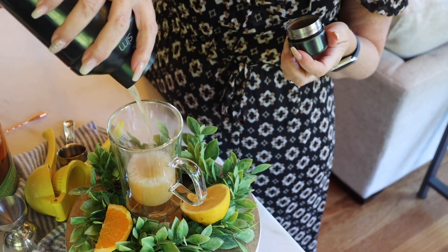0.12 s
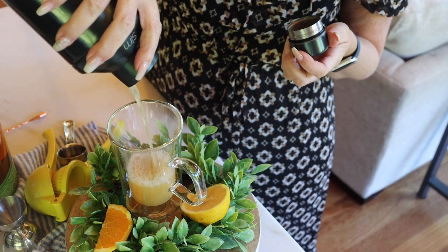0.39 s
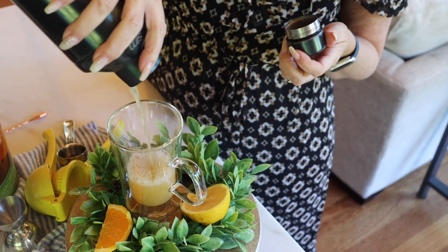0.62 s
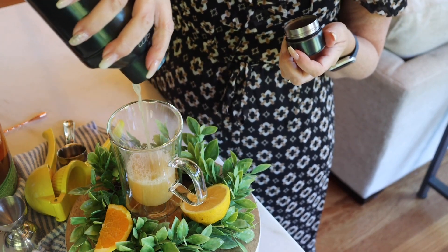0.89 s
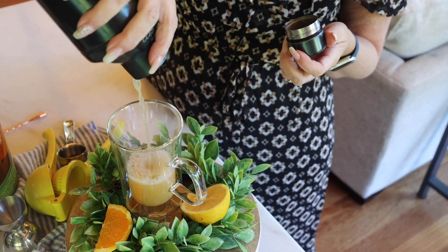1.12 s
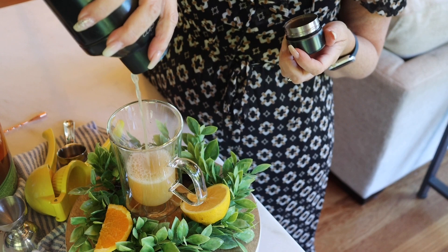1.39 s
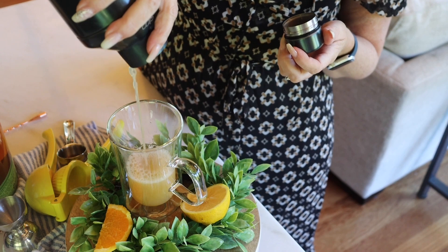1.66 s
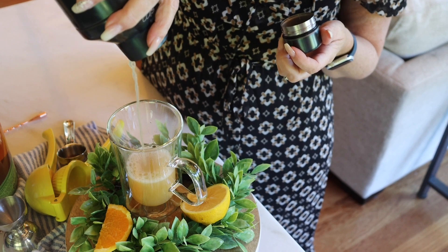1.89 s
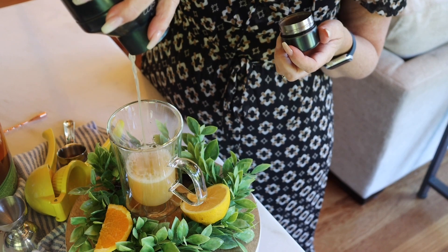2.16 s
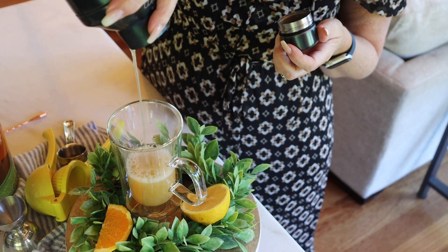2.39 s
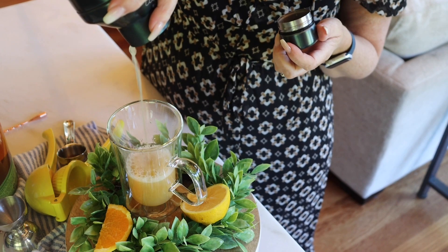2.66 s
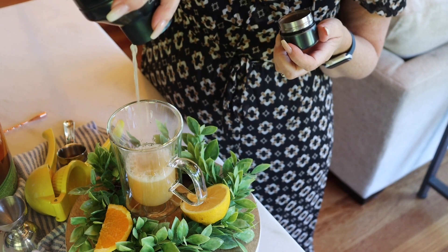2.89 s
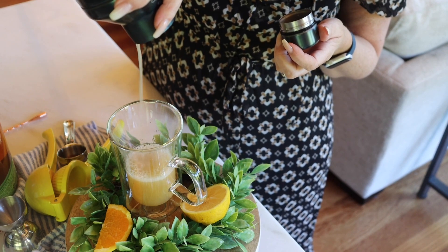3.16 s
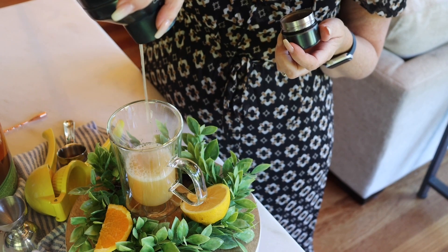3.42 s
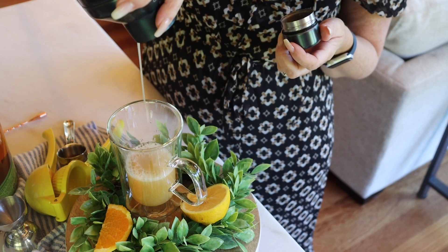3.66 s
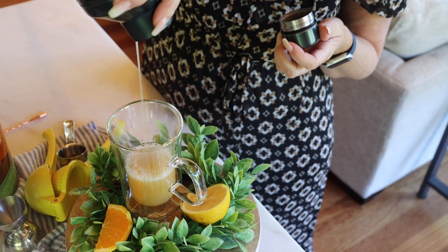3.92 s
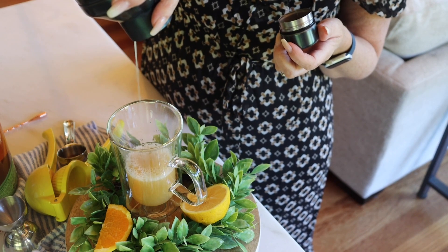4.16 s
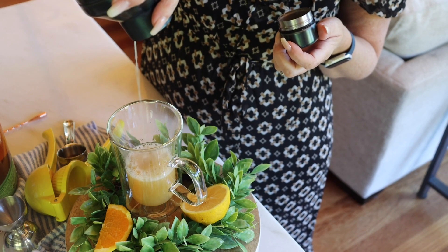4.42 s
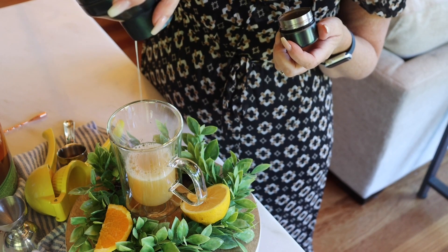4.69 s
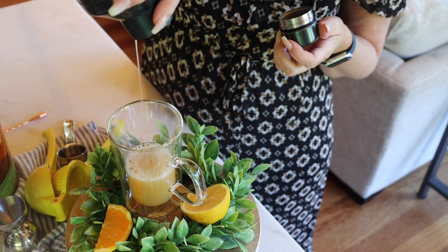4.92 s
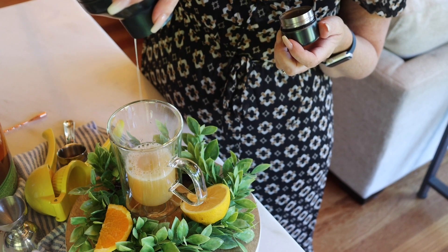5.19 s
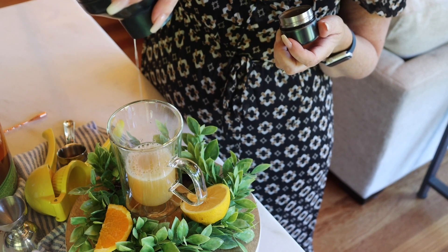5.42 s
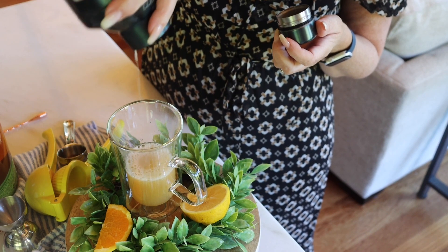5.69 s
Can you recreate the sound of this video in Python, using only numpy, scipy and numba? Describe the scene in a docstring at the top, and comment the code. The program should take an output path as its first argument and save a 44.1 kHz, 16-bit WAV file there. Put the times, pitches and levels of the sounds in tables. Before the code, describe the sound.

Close, wet pour into glass with hollow plops and crisp bubble ticks, crowding mid-way then dwindling to drips over faint room hum.

```python
"""A drink is poured from a shaker into a glass mug in a quiet kitchen, over steady room noise and a wavering hum.
An opening gurgle of clumped clicks through ringing bubbles breaks up into sparse plops: rising sines that drive
the air column. From about 1.7 s the stream returns and plops crowd, with ticking bubbles and fizz of short rings
and noise; after about 4 s it thins to a trickle. The column pitch climbs throughout as the glass fills."""
import sys
import numpy as np
from scipy import signal
from scipy.fft import rfft, irfft, next_fast_len
from scipy.io import wavfile
from numba import njit

SR = 44100
rng = np.random.default_rng(int(sys.argv[2]) if len(sys.argv) > 2 else 0)


def volts_from_db(level):
    """Convert decibel levels to linear amplitude ratios."""
    exponent = np.asarray(level, float) / 20
    return 10 ** exponent


def output_pcm(signal):
    """Save a mono or channel-first signal as 16-bit PCM at the path in sys.argv[1].

    Samples are clipped to [-1, 1] before scaling.
    """
    pcm = np.clip(np.atleast_2d(signal).T, -1, 1) * 32767
    wavfile.write(sys.argv[1], SR, np.round(pcm).astype(np.int16))


N = 256309


def rms_one(x):
    """Scale to unit rms."""
    return x / np.sqrt(np.mean(x ** 2) + 1e-20)


def in_time(rows):
    """Columns of a time curve, interpolated at every sample."""
    s, *columns = np.transpose(rows)
    return [np.interp(np.arange(N) / SR, s, c) for c in columns]


def at_hz(points):
    """A spectrum table on the FFT grid, interpolated over log frequency."""
    hz = np.arange(N // 2 + 1) * SR / N + 1
    table_hz, values = np.array(points).T
    return np.interp(np.log(hz), np.log(table_hz + 1), values)


def filtered(x, order, hz, kind):
    """Butterworth filter."""
    return signal.sosfilt(signal.butter(order, hz, kind, fs=SR, output="sos"), x)


def drift(corner_hz):
    """Slow random curve of unit rms: noise through two equal poles."""
    r = np.exp(-2 * np.pi * corner_hz / SR)
    return rms_one(signal.lfilter([1], [1, -2 * r, r * r], rng.standard_normal(N + SR))[SR:])


def grains(per_s, spread_db, most=3.34):
    """Random clicks of either sign, a few much larger than the rest."""
    sizes = volts_from_db(spread_db * np.minimum(rng.exponential(1, N), most)) * rng.choice([-1, 1], N)
    return sizes * (rng.random(N) < per_s / SR)


def ring(clicks, hz, t60_s):
    """Damped mode: a unit click starts a sine of height 1."""
    r, w = volts_from_db(-60 / (t60_s * SR)), 2 * np.pi * hz / SR
    return signal.lfilter([0, np.sin(w)], [1, -2 * r * np.cos(w), r * r], clicks + 1e-18)


def dealt_rings(clicks, low_hz, high_hz, cycles, count):
    """Each click rings at one of several pitches, dealt at random, down 60 dB after some cycles."""
    dealt = rng.integers(0, count, N)
    pitches_hz = np.geomspace(low_hz, high_hz, count)
    return sum(ring(clicks * (dealt == k), hz, cycles / hz) for k, hz in enumerate(pitches_hz))


@njit
def sliding_ring(x, w, r):
    """Damped mode whose pitch follows w, in radians a sample."""
    y = np.zeros(len(x))
    for i in range(2, len(x)):
        y[i] = np.sin(w[i]) * x[i - 1] + 2 * r * np.cos(w[i]) * y[i - 1] - r * r * y[i - 2]
    return y


def aftermath(x, t60_s):
    """The dying stir that each event leaves behind: a smoothed envelope."""
    fade = volts_from_db(-60 / (t60_s * SR))
    return signal.lfilter([1 - fade], [1, -fade], np.abs(x))


# room noise spectrum, relative (f/Hz, level per Hz/dB)
HUSH_SPECTRUM = [(25, -6), (40, -2.5), (125, 5), (250, -0.5), (450, 4.5), (800, -2.5), (1600, -9.5),
                 (2600, -11.5), (5000, -12.5), (9000, -14.5), (12300, -16), (15500, -26)]
# left-right correlation of the room noise (f/Hz, correlation/1)
HUSH_LIKENESS = [(60, 0.93), (300, 0.8), (1000, 0.2), (4000, 0.067), (15000, 0.15)]
HUSH_RMS_DB = -54
HUM_HZ, HUM_WAVER_RMS_HZ, HUM_PEAK_DB, HUM_DRIFT_RMS_DB = 218, 3.76, -63, 3.2


def hush():
    """Steady room noise, more alike left and right in the bass, with an appliance hum wavering in pitch and level."""
    mid, side = rfft(rng.standard_normal((2, N))) * volts_from_db(at_hz(HUSH_SPECTRUM))
    alike = np.clip(at_hz(HUSH_LIKENESS), 0, 1)
    noise = rms_one(irfft(np.sqrt(1 + alike) * mid + np.sqrt(1 - alike) * side * [[1], [-1]], N))
    hum = np.sin(2 * np.pi * np.cumsum(HUM_HZ + HUM_WAVER_RMS_HZ * drift(7.2)) / SR)
    return volts_from_db(HUSH_RMS_DB) * noise + volts_from_db(HUM_PEAK_DB + HUM_DRIFT_RMS_DB * drift(1.0)) * hum


KITCHEN_T60_S, WALL_CUT_HZ, KITCHEN_DB = 0.55, 5700, -23.5


def kitchen(x):
    """Room reverberation: eight feedback delays a side, duller on every round."""
    size = next_fast_len(N + SR)
    turn = np.exp(-2j * np.pi * np.arange(size // 2 + 1) / size)  # delay of one sample
    dull = np.exp(-2 * np.pi * WALL_CUT_HZ / SR)
    wall = (1 - dull) / (1 - dull * turn)
    out = np.zeros((2, size // 2 + 1), complex)
    for k, lag in enumerate((np.geomspace(.007, .033, 16) * SR).astype(int)):
        loop = volts_from_db(-60 * lag / SR / KITCHEN_T60_S) * wall * turn ** lag
        out[k % 2] += loop / (1 - loop) * (-1) ** (k // 2)
    return volts_from_db(KITCHEN_DB) * irfft(out * rfft(x, size), size)[:, :N]


TABLE_T60_S, TABLE_DB = 0.035, -6


def table_top(x):
    """Leaves, fruit and glassware close by scatter the treble into a short dense tail, another one to each side."""
    t = np.arange(round(TABLE_T60_S * SR)) / SR
    tails = rng.standard_normal((2, len(t))) * volts_from_db(-60 * t / TABLE_T60_S)
    tails = volts_from_db(TABLE_DB) * tails / np.linalg.norm(tails, axis=1, keepdims=True)
    return filtered(signal.fftconvolve(x[None], tails, axes=1)[:, :N], 1, 2000, "high")


# level of left over right (f/Hz, level/dB)
LEFT_LOUDER = [(300, 2), (2400, -2.5), (5000, -0.5), (13000, 4.5)]
# phase lead of left over right (f/Hz, phase/rad)
LEFT_LEADS = [(1500, 0.026), (3000, 0.83), (4500, 0.06), (8000, 0.97), (10500, 1.64), (14000, 0.6)]
SPOT_SCATTER_RAD = 0.28  # rms, each side, before the treble weighting


def two_ports(x):
    """Two microphone openings differ in level and phase by pitch; scattered droplets make treble phase wander."""
    half = volts_from_db(at_hz(LEFT_LOUDER) / 2) * np.exp(.5j * at_hz(LEFT_LEADS))
    both = rfft(x) * np.array([half, 1 / half])
    turn = SPOT_SCATTER_RAD * drift(34.0) * [[1], [-1]]
    treble = both * np.clip(at_hz([(1300, 0.), (2200, 1.0), (15000, 0.44)]), 0, 1)
    return irfft(both, N) + irfft(treble, N) * (np.cos(turn) - 1) + irfft(1j * treble, N) * np.sin(turn)


# level of the low wash, relative to the churn (t/s, level/dB)
WASH_LEVEL = [(0, -16), (1.7, -17), (2.9, -20), (3.2, -12.5), (3.6, -16.5), (4, -29), (5.81, -12.5)]


def slosh(churn):
    """The churned drink heaves against the walls: a low, dull band of noise."""
    wash = filtered(rng.standard_normal(N), 2, [320., 760.], "band")
    return volts_from_db(in_time(WASH_LEVEL)[0]) * churn * rms_one(wash)


# drive of a hollow ring, swelling then fading as the shaker is lifted away (t/s, level/dB)
HOLLOW_LEVEL = [(0, -28.5), (1.2, -21), (2.3, -28), (3.2, -36), (5.81, -65)]


def hollow(push):
    """A low damped mode, probably the air in the shaker."""
    return volts_from_db(in_time(HOLLOW_LEVEL)[0]) * ring(push, hz=393.7, t60_s=0.12)


# modes of the glass wall (f/Hz, level/dB, t60/s)
GLASS_MODES = [(1761, -21, 0.078), (1890, -18, 0.046), (2645, -29, 0.058)]


def glass(push):
    """Walls and stand answer the liquid with their own damped modes."""
    return sum(volts_from_db(level_db) * ring(push, hz, t60_s) for hz, level_db, t60_s in GLASS_MODES)


# air column above the drink; a rough surface spreads its modes (t/s, f/Hz, spread/share of f)
AIR_COLUMN = [(0, 966, 0.11), (1.5, 998, 0.17), (2.3, 1027, 0.17), (3.2, 1036, 0.097), (4, 1132, 0.042),
              (5.81, 1165, 0.041)]


def column_pitch():
    """Column pitch in radians a sample, rising as the glass fills, and the spread of its modes."""
    hz, spread = in_time(AIR_COLUMN)
    return 2 * np.pi * hz / SR, spread


def rim(x):
    """The mouth passes a band round the column pitch: two broad resonances of opposite sign, steep outside."""
    w, spread = column_pitch()
    r = np.exp(-np.pi * 260. / SR)  # bandwidth 260 Hz
    lower = sliding_ring(x, w * (1 - 0.52 * spread), r)
    upper = sliding_ring(x, w * (1 + 1.95 * spread), r)
    return 2 * (1 - r) * (lower - upper)


def air_column(push, t60_s):
    """The air above the drink rings as a main mode with two neighbours."""
    w, spread = column_pitch()
    r = volts_from_db(-60 / (t60_s * SR))
    main = sliding_ring(push, w, r)
    below = sliding_ring(push, w * (1 - spread), r)
    above = sliding_ring(push, w * (1 + spread), r)
    return rim(main + 0.19 * below + 0.37 * above)


# colour of sharp sounds (f/Hz, level/dB)
SNAP_SPECTRUM = [(600, -79), (1500, 1.5), (2500, 2), (3600, 0), (6000, -1), (8000, 1), (9700, -5.5),
                 (11300, 1.5), (12500, 4.5), (13800, -4.5), (15500, 7)]


def snap_colour(x):
    """Colour that glass and microphone give to anything sharp; minimum phase, so nothing sounds early."""
    cepstrum = irfft(np.log(volts_from_db(at_hz(SNAP_SPECTRUM))), N)
    cepstrum[1:N // 2] *= 2
    cepstrum[N // 2 + 1:] = 0
    return irfft(rfft(x) * np.exp(rfft(cepstrum)), N)


def fizz(stir, clumps):
    """Tiny bubbles ring a few cycles, film snaps tick at pitches of their own, finer droplets blend into a rush."""
    busy = volts_from_db(5.0 * clumps + 5.0 * drift(40.))
    bubble_clicks = grains(500.0 * busy, spread_db=4.5, most=2.5)
    rings = rms_one(dealt_rings(bubble_clicks, 1900.0, 14000.0, cycles=25.0, count=18))
    film_clicks = grains(35. * busy, spread_db=5.5, most=2.5)
    ticks = rms_one(dealt_rings(film_clicks, 2500.0, 15400.0, cycles=5.0, count=12))
    rush = volts_from_db(0.65 * clumps) * rng.standard_normal(N)
    return stir * snap_colour(rings + 0.49 * ticks + 0.19 * rush)


def gurgle(stir, clumps):
    """The stream beats on the surface in clumps and drags bubbles of many sizes under; each beat ticks."""
    beats = grains(320. * volts_from_db(6. * clumps), spread_db=3.5, most=3.)
    bubbles = rms_one(rim(dealt_rings(beats, 681.0, 1470.0, cycles=46.0, count=10)))
    ticks = rms_one(snap_colour(beats))
    return stir * (rms_one(air_column(beats, t60_s=0.028)) + 0.5 * bubbles + 0.27 * ticks)


def blips(events, cycles, rise, swell_cycles, gain_db):
    """Each bubble swells, rings some cycles and rises in pitch, nearing the surface, then holds it."""
    out, chance = np.zeros(N + SR), rng.standard_normal(len(events))
    for (s, peak_db, hz), rings, steeper in zip(events, np.broadcast_to(cycles, len(events)), chance):
        turns = np.arange(SR // 10) * hz / SR
        shape = (1 - np.exp(-turns / swell_cycles)) * volts_from_db(-60 * turns / rings)
        climb = np.minimum(turns, rings / 2)
        bend = rise * np.exp(0.404 * steeper) * climb * (2 * turns - climb)
        at = round(s * SR)
        out[at:at + len(turns)] += volts_from_db(peak_db + gain_db) * shape / shape.max() * np.sin(2 * np.pi * (turns + bend))
    return out[:N]


def impacts(events, gain_db):
    """The bare click with which an event begins, its level scattered by 3 dB rms."""
    out = np.zeros(N)
    for (s, peak_db, hz), chance in zip(events, rng.standard_normal(len(events))):
        out[round(s * SR)] += volts_from_db(peak_db + gain_db + 3. * chance)
    return out


# levels in these three are before gain_db; f is the starting pitch
# lumps plunging in, each trapping air of its own pitch (t/s, level/dB, f/Hz)
PLOPS = [(0.014, -36, 950), (0.039, -30.5, 940), (0.108, -25, 980), (0.132, -27, 990), (0.162, -23.5, 990),
         (0.2, -32, 1000), (0.251, -18, 975), (0.566, -18.5, 1010), (0.787, -33.5, 1090),
         (0.971, -31, 1020), (1.113, -12.5, 1014), (1.213, -31, 984), (1.347, -26.5, 993),
         (1.476, -36, 1210), (1.518, -27, 930), (1.55, -33.5, 1030), (1.6, -33.5, 1120), (1.635, -33, 1240),
         (1.674, -25, 1240), (1.842, -28.5, 1310), (1.862, -22.5, 1230), (1.884, -24.5, 994),
         (1.925, -20, 1170), (1.946, -23.5, 1190), (2.029, -19.5, 926), (2.091, -19, 1020),
         (2.097, -19, 856), (2.214, -22, 1055), (2.251, -10.5, 1060), (2.284, -21.5, 1020),
         (2.312, -17, 1070), (2.337, -18, 1090), (2.488, -22, 1110), (2.596, -13, 1034), (2.638, -17, 1060),
         (2.704, -17.5, 1060), (2.725, -10.5, 1063), (2.773, -21, 1130), (2.784, -15.5, 1025),
         (2.889, -24.5, 1100), (2.912, -14.5, 1070), (2.954, -17, 990), (2.967, -19, 1085),
         (3.007, -23, 1110), (3.078, -4.5, 1030), (3.147, -12, 1040), (3.155, -8.5, 1000),
         (3.226, -20, 1000), (3.255, -24, 1050), (3.279, -27, 1190), (3.386, -22.5, 1060),
         (3.446, -20, 1096), (3.565, -17.5, 954), (3.589, -19, 1210), (3.7362, -6, 1074),
         (3.791, -13.5, 1176), (3.804, -18, 1060), (3.8352, -13.5, 1120), (3.984, -15, 1110),
         (4, -25, 1150), (4.034, -17.5, 1130), (4.095, -11, 1113), (4.245, -12, 1130), (4.317, -28, 1210),
         (4.5225, -18.5, 1176), (4.534, -24, 1190), (4.577, -26, 1150), (4.68, -31.5, 1200),
         (4.767, -21.5, 1200), (4.848, -18.5, 1170), (4.867, -26, 1220), (4.991, -26.5, 1225),
         (5.045, -29.5, 1226), (5.1, -31.5, 1230), (5.2025, -19, 1220), (5.302, -23.5, 1166),
         (5.346, -23.5, 1214), (5.484, -22, 1200), (5.598, -30.5, 1200), (5.685, -22, 1200),
         (5.73, -18, 1220)]
# loudest small bubbles pinching off and droplets snapping (t/s, level/dB, f/Hz)
BUBBLES = [(0.0127, -25.5, 4030), (0.015, -26.5, 2380), (0.038, -25, 5750), (0.071, -28, 7640),
           (0.073, -28, 2240), (0.107, -8.5, 8300), (0.1318, -16, 5550), (0.1404, -22, 2680),
           (0.1616, -12, 10100), (.198, -29, 2440), (0.206, -33, 3200), (.301, -29, 2540),
           (.848, -21, 13000), (1.112, -37, 11900), (1.2135, -33.5, 5030), (1.346, -14, 11500),
           (1.4461, -28.5, 2300), (1.511, -32.5, 2340), (1.549, -34, 2420), (1.636, -33, 2450),
           (1.6734, -32.5, 2370), (1.679, -25, 11600), (1.72, -25.5, 3130), (1.811, -36.5, 3300),
           (1.8835, -22.5, 2870), (1.884, -22, 5600), (1.9267, -25, 3700), (1.9576, -25.5, 1894),
           (2.062, -25, 2360), (2.1202, -14.5, 12900), (2.207, -30, 2270), (2.243, -22.5, 4850),
           (2.252, -29, 2280), (2.2844, -23, 2880), (2.285, -20.5, 4840), (2.295, -26.5, 813),
           (2.3374, -23, 2550), (2.3606, -27, 2830), (2.426, -29, 9500), (2.452, -22, 9700),
           (2.4704, -15, 8800), (2.515, -21.5, 2610), (2.5463, -27, 11900), (2.564, -20.5, 12500),
           (2.598, -18.5, 8500), (2.696, -20.5, 8000), (2.785, -23, 3840), (2.786, -25.5, 8250),
           (2.822, -17, 7200), (2.862, -22, 7540), (2.8893, -20.5, 8600), (2.9171, -11.5, 1835),
           (2.916, -32, 7800), (2.9573, -20, 10800), (2.958, -20.5, 2280), (3.0076, -16.5, 10300),
           (3.078, -19.5, 8060), (3.1247, -20, 3880), (3.1247, -15.5, 6250), (3.1475, -27, 2300),
           (3.147, -28.5, 703), (3.1722, -23.5, 3940), (3.19, -25, 5160), (3.213, -27, 4600),
           (3.2271, -20.5, 4400), (3.255, -14, 12600), (3.281, -25.5, 2320), (3.3084, -26, 4250),
           (3.343, -19, 5800), (3.387, -21.5, 7400), (3.388, -25.5, 2220), (3.414, -15.5, 12400),
           (3.4258, -19, 1850), (3.4448, -26, 8600), (3.5009, -21.5, 9820), (3.5645, -22.5, 3210),
           (3.627, -22.5, 8500), (3.644, -26, 5200), (3.7367, -24, 1600), (3.753, -29, 5460),
           (3.763, -28.5, 2700), (3.8353, -29, 1690), (3.835, -27, 9100), (3.9235, -24.5, 7350),
           (3.937, -22, 12400), (4.0345, -24.5, 5300), (4.0938, -28.5, 2700), (4.1879, -27.5, 2600),
           (4.311, -30, 5740), (4.317, -32.5, 3170), (4.352, -23.5, 8900), (4.372, -25, 8650),
           (4.5218, -27.5, 2010), (4.585, -27, 6900), (4.721, -26, 8560), (4.755, -30.5, 4750),
           (4.766, -28.5, 1970), (4.866, -30, 6760), (4.944, -33, 3100), (4.992, -31, 4620),
           (5.0465, -34, 3340), (5.0959, -18.5, 12200), (5.2022, -27, 2050), (5.2926, -29.5, 7400),
           (5.4244, -24.5, 11500), (5.5619, -30.5, 3000), (5.597, -27, 8600), (5.687, -31, 1850)]
# bubbles bursting through the surface, sweeping up (t/s, level/dB, f/Hz)
CHIRPS = [(2.769, -28, 2290), (2.886, -31.5, 1980), (2.922, -28.5, 1890), (2.964, -26, 2330),
          (3.009, -25, 1995), (3.04, -33, 2500), (3.428, -28, 1910)]


def splashes():
    """Plops, bubbles and snaps drive the air column; plops and bubbles start with a snap. Returns low, high."""
    trapped = blips(PLOPS, 21, rise=0.00028, swell_cycles=.03, gain_db=-1.0)
    plops = 0.99 * rim(trapped) + 0.13 * filtered(trapped, 2, 600., "high")
    cycles = 23 * (np.array(BUBBLES)[:, 2] / 2000.0) ** -.45  # the tiniest are damped fastest
    bubbles = blips(BUBBLES, cycles, rise=0.00575, swell_cycles=.5, gain_db=1.5)
    chirps = blips(CHIRPS, 45., rise=0.017, swell_cycles=4., gain_db=-3.)
    snaps = snap_colour(impacts(PLOPS, gain_db=-7.0) + impacts(BUBBLES, gain_db=-5))
    column = air_column(plops + 19.7 * bubbles + 3.2 * snaps, t60_s=0.2)
    return plops + volts_from_db(-60.0) * column, bubbles + chirps + snaps


# the stream, before the offsets in scene() (t/s, gurgle level/dB, fizz level/dB)
POUR_LEVELS = [(0, -33, -34.5), (.15, -40, -41.5), (.35, -51, -53), (1, -56, -52.5), (1.7, -51.5, -50),
               (1.9, -43.5, -49), (2.3, -39.5, -43), (3.1, -42, -48.5), (3.6, -44, -46), (3.9, -40, -55),
               (4.5, -52, -56), (5.81, -51.5, -57)]


def scene():
    """The pour, near and in the room, over the hush."""
    gurgle_db, fizz_db = in_time(POUR_LEVELS)
    clumps = drift(22.)
    low, high = splashes()
    churn = aftermath(low, t60_s=0.038)  # each plunge churns the drink for a moment
    murmur = gurgle(volts_from_db(gurgle_db) + volts_from_db(-11.0) * churn, clumps)
    froth_stir = volts_from_db(fizz_db - 2.5) + volts_from_db(-22.5) * churn + volts_from_db(-7.0) * aftermath(high, t60_s=0.013)
    froth = fizz(froth_stir, clumps)
    pour = slosh(churn + 1.01 * volts_from_db(gurgle_db)) + murmur + low + high + froth
    pour += hollow(low + 1.2 * murmur)
    pour += glass(volts_from_db(-7.5) * low + volts_from_db(-24.0) * (high + froth))
    pour = filtered(pour, 2, 117, "high")  # small sources radiate no bass
    return two_ports(pour) + table_top(pour) + kitchen(pour) + hush()


def top_cut(x):
    """Nothing passes above the cut-off."""
    return signal.sosfilt(signal.butter(12, 16670, fs=SR, output="sos"), x)


def record(dry):
    """The top is cut steeply above 14.2 kHz."""
    mix = filtered(dry, 8, 14200, "low")
    return top_cut(mix)


dry = scene()
out = record(dry)
output_pcm(out)
```